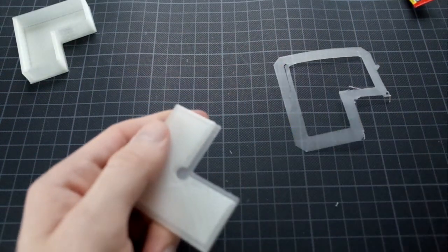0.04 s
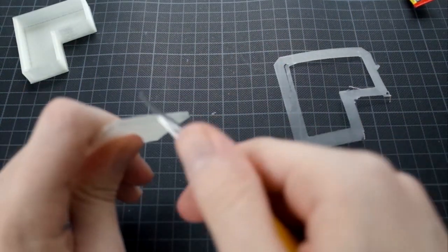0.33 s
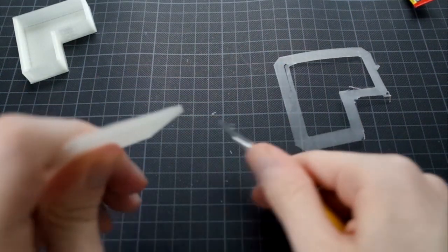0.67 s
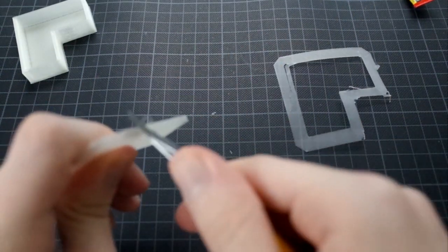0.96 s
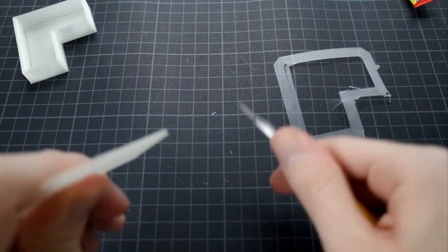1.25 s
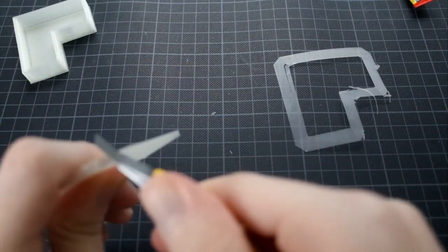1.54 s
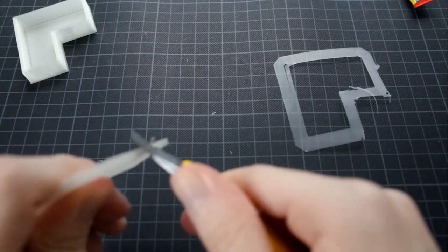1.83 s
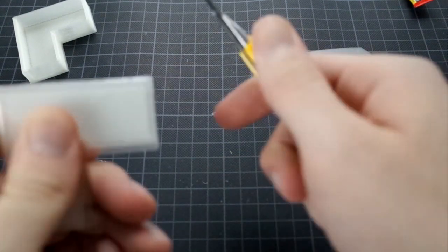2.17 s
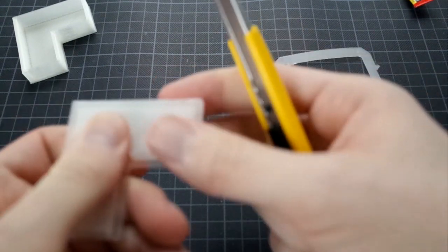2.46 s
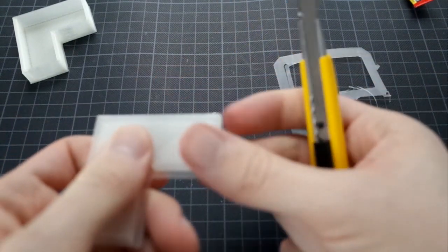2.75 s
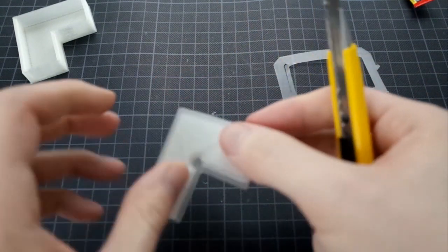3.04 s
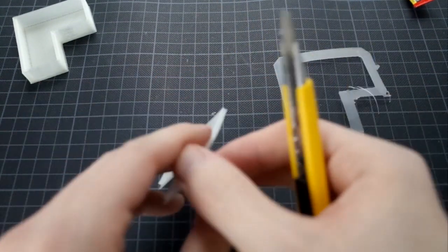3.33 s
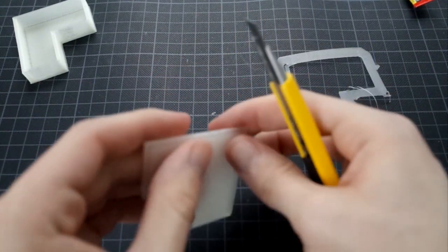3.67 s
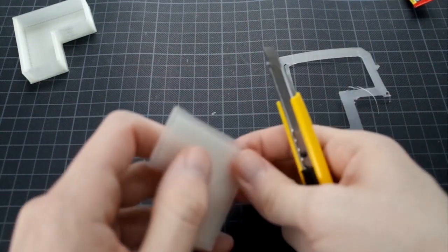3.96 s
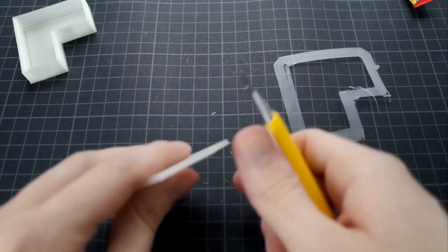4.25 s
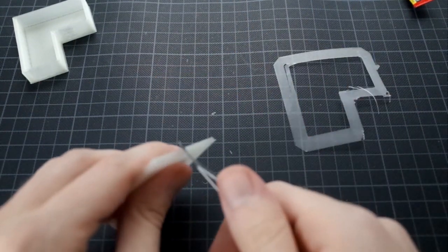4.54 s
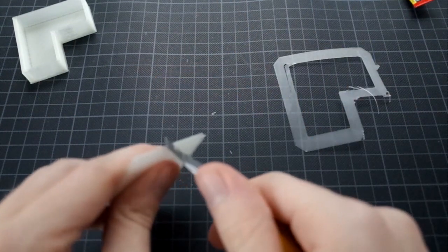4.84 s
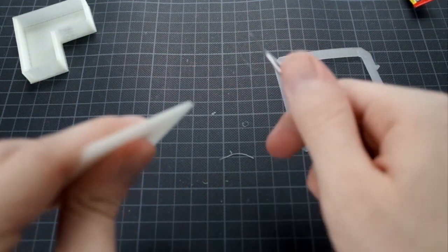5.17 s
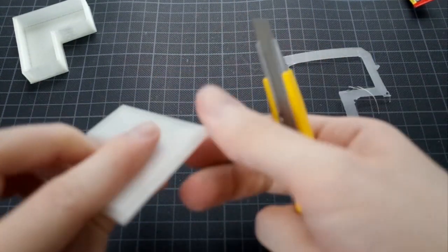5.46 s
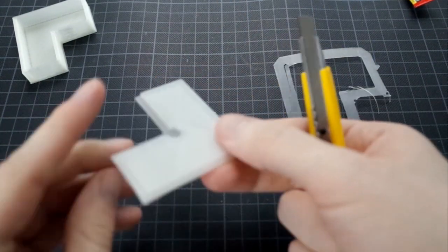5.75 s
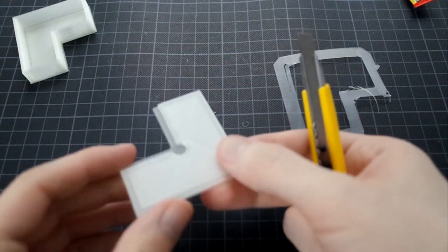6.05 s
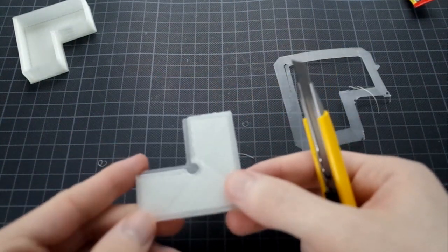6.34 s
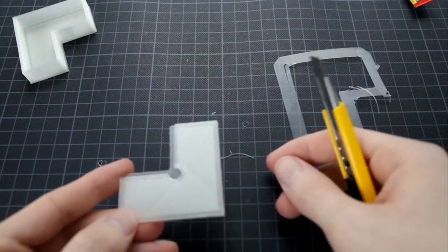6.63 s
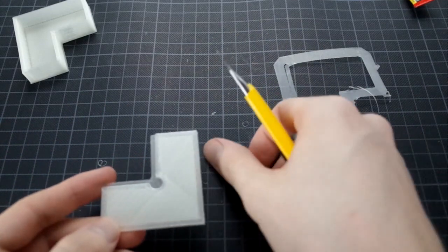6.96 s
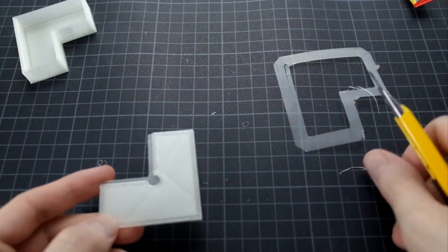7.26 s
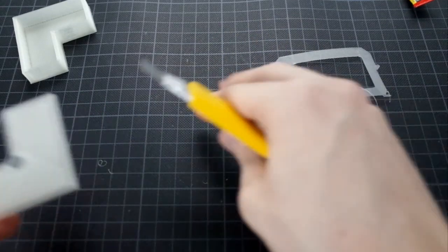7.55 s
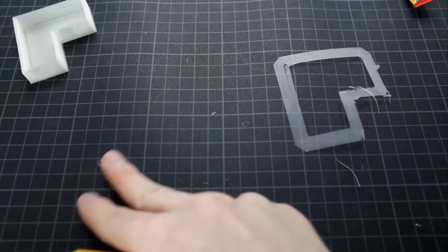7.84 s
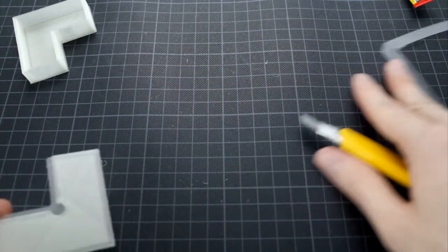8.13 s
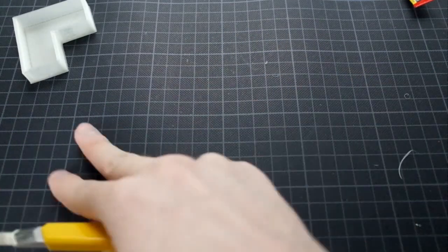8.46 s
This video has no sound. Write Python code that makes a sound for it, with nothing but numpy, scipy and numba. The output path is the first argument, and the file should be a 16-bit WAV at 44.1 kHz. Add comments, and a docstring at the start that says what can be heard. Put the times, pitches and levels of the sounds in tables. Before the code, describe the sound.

Light ticks of plastic in the fingers open, with a brief fading hiss at 0.25 seconds. From 0.5 to 2.1 seconds a utility knife trims a small plastic part: it clicks onto the edge, scrapes in short thin rasps and snaps free, sharpest at 0.8, 1.35 and 2.1 seconds. From about 2.7 to 4.5 the part is turned with many quiet ticks and skin rubs, and knuckles bump and judder on the cutting mat around 3.5. The blade clicks at 4.7, skips lightly, scrapes and snaps at 5.15, with a low, soft boom from the table. Sparse faint ticks follow. After a light knock at 7.1, a hand brushes the mat, then makes a louder, airy sweep from left to right between 8 and 8.5. Everything is close to a stereo microphone in a small dry room, over dull handling rumble, faint steady hiss and a low hum.

```python
"""Light ticks of plastic in the fingers and a brief hiss, then a utility knife lands on a printed part.
Close to a stereo microphone in a small dry room, the blade trims the thin brim: it clicks down, scrapes
along the edge in tiny slips and snaps free. The part is turned with ticks and rubs, hands bump and slide
on the cutting mat, the table booms, and at last a hand sweeps the shavings aside from left to right.
Underneath lie dull handling rumble, steady hiss and a faint hum."""
import sys
import numpy as np
from scipy import signal
from scipy.fft import rfft, irfft, next_fast_len
from scipy.io import wavfile
from numba import njit

SR = 44100
rng = np.random.default_rng(int(sys.argv[2]) if len(sys.argv) > 2 else 0)


def wrap_up_sound(samples):
    """Save the sound to the file named by the first command line argument, as 16-bit audio."""
    columns = np.atleast_2d(samples).T
    # keep every value between -1 and 1, then stretch to whole-number steps
    tamed = np.clip(columns, -1, 1)
    steps = np.round(tamed * 32767).astype(np.int16)
    wavfile.write(sys.argv[1], SR, steps)


N = 374850

# How alike the two microphones hear close sound. Each row: frequency in Hz, likeness from -1 to 1.
CLOSE_LIKENESS = [(2500, 0.99), (4500, 0.64), (8000, 0.027)]
# The same for sound from all around. Each row: frequency in Hz, likeness from -1 to 1.
DIFFUSE_LIKENESS = [(500, 0.6), (3000, 0.026)]
PART_HZ = 4000   # the plastic part's own resonance


def blade_clicks():
    """The blade lands hollowly and snaps free: the close sound, and plain cracks to feed the room."""
    # The blade meets the edge. Each row: start in seconds, level in dB, tilt in dB per octave.
    landings = [(0.5394, -19.5, -0.5), (1.0888, -18, 0), (1.6978, -27.5, -1.5)]
    # The blade catches or breaks free. Each row: start in seconds, level in dB, tilt in dB per octave,
    # ring frequency in Hz, ring height in dB.
    snaps = [(0.7858, -10.5, 3, 3380, 16), (1.194, -36, 1, 2290, 28), (1.3235, -27.5, 1.5, 3790, 0),
             (1.3371, -28, -2, 3450, 7), (1.3466, -16, 3.5, 3660, 16.5), (1.9314, -30.5, -8.5, 3420, 17),
             (2.0482, -30, -5, 3680, 26), (2.0721, -16, 1, 5900, 7.5), (4.674, -27, 5, 3970, 22.5),
             (5.1348, -29, -3, 3780, 15), (5.1425, -15.5, 1.9, 5630, 1.5)]
    # Spectra of a landing and of a snap. Each row: frequency in Hz, level in dB.
    landing_colour = [(250, -38), (885, -12.5), (1430, -26.5), (2300, -1.5), (2880, -21), (3240, -6.5),
                      (4440, 0), (6100, -11.5), (7080, 2), (7820, -13), (13300, -3), (16000, -16.5)]
    snap_colour = [(150, -25.5), (950, -15), (1500, -17.5), (3200, -6), (5800, -0.5), (13500, -8.5),
                   (16000, -13)]
    direct, into_room = np.zeros((2, 2, N))
    plain_crack = coloured(signal.unit_impulse((2, 4096)), snap_colour, CLOSE_LIKENESS,
                           lambda hz: peak(hz, ring_hz=6270, ring_db=0.5, width_hz=750))
    for start, db, tilt in landings:
        add(direct, start, click(landing_colour, db, decay_ms=3.8, tilt=tilt, shape=1.4))
    for start, db, tilt, ring_hz, ring_db in snaps:
        snap = click(snap_colour, db, decay_ms=3, tilt=tilt, shape=1.0,
                     ring=lambda hz: peak(hz, ring_hz, ring_db, width_hz=650))
        add(direct, start, snap)
    for start, db, *_ in landings + snaps:
        add(into_room, start, at_level(plain_crack, db - 13.5))
    return direct, into_room


def click(colour, db, decay_ms, tilt, shape, ring=np.zeros_like):
    """A crack in the plastic, tilted above 2 kHz; the grip decides which resonance stands out."""
    def shade(hz):
        return tilt * np.log2(np.maximum(hz, 2000) / 6000) + ring(hz)
    crack = burst(decay_ms, rise_ms=.8, shape=shape)
    return at_level(coloured(crack, colour, CLOSE_LIKENESS, shade), db)


def blade_scrape():
    """The edge sticks and slips through the print layers, ringing the steel and the gripped part."""
    # Spectrum of the rasp. Each row: frequency in Hz, level in dB.
    rasp_colour = [(200, -23.5), (900, -14), (1500, -18), (2250, -5.5), (7000, -5), (11000, -5.5),
                   (16000, -11.5)]
    # Resonances of the steel blade. Each row: frequency in Hz, level relative to the stroke in dB.
    blade_modes = [(7500, -15.5), (11900, -8.5), (13400, -21)]
    force_db, grip_hz, ring_db = blade_strokes()
    rasp = coloured(friction(per_s=900, spread_db=1.6, smooth=.5), rasp_colour, CLOSE_LIKENESS)
    # two resonances of the part shift under the blade
    upper = resonate(rasp, 1.04 * grip_hz + 220 * drift(110), width_hz=800.0)
    lower = resonate(rasp, .76 * grip_hz + 220 * drift(110), width_hz=800.0)
    part = rms_one(upper - 0.78 * lower) * from_db(ring_db)
    steel = 0
    for hz, db in blade_modes:
        mode = rms_one(resonate(rasp, np.full(N, float(hz)), width_hz=1300.0))
        steel = steel + mode * from_db(db + 3 * drift(35))   # comes and goes as the contact moves
    return (0.81 * rasp + steel + part) * from_db(force_db + 1.27 * drift(90))


def blade_strokes(bite_s=0.0023, release_s=0.0055, sag_hz_per_s=3100):
    """Each stroke bites, gains or loses force and lets go; the resonance falls as the blade travels."""
    # Cuts along the edge. Each row: start and length in seconds, level at mid-stroke in dB, change over
    # the stroke in dB, the part's nominal resonance in Hz, its ring relative to the stroke in dB.
    strokes = [(0.576, 0.11, -64, 6.5, 3600, 3), (0.693, 0.085, -47.5, 4, 3280, 0),
               (1.144, 0.11, -50.5, -4.5, 3550, -4), (1.266, 0.091, -44.5, 14, 3600, -7),
               (1.836, 0.088, -48.5, -6, 3500, -8), (1.92, 0.056, -43, -2, 3300, -7),
               (2.041, 0.023, -41, 8, 3700, -3.5), (5.068, .046, -45, -5, 4150, -9),
               (5.112, 0.021, -48, 4, 3870, 0), (5.141, 0.011, -37, -6, 5600, -2)]
    t = np.arange(N) / SR
    force, grip_hz, ring_db = 1e-9, PART_HZ, 0
    for start, length, db, change_db, hz, stroke_ring_db in strokes:
        age = np.clip(t - start, 0, length)
        bite = np.minimum(age / bite_s, 1)
        release = np.exp(-np.maximum(t - start - length, 0) / release_s)
        force = force + bite * release * from_db(db + change_db * (age / length - .5))
        grip_hz = np.where(t > start, hz - sag_hz_per_s * (age - length / 2), grip_hz)
        ring_db = np.where(t > start, stroke_ring_db, ring_db)
    return 20 * np.log10(force), grip_hz, ring_db


def handling_ticks(width_hz=670):
    """The part and the loose blade tick in the fingers; once the tip skips over the print's ridges."""
    # Light contacts. Each row: start in seconds, level in dB, ring frequency in Hz.
    touches = [(0.0155, -35, 4500), (0.128, -42, 4650), (0.1814, -39.5, 7000), (1.4352, -42, 6640),
               (1.7662, -39.5, 4940), (2.940, -47.5, 5070), (2.986, -44.5, 5000), (3.0549, -36.5, 5600),
               (3.103, -40, 6600), (3.1588, -36.5, 8450), (3.196, -34.5, 5440), (3.241, -37, 3800),
               (3.2787, -40.5, 5840), (3.3333, -33.5, 5800), (3.3877, -35, 5700), (3.6765, -34.5, 8300),
               (3.719, -36, 5660), (3.8124, -38.5, 5590), (3.9018, -38.5, 7200), (3.919, -38.5, 5950),
               (3.9898, -33.5, 8820), (4.0646, -37, 6100), (4.206, -46, 5800), (4.5253, -35, 4630),
               (4.538, -41, 5400), (4.7469, -41, 3700), (4.836, -50, 4060), (4.9552, -37.5, 4100),
               (5.1797, -36.5, 5500), (5.681, -43.5, 5100), (5.7301, -43.5, 5300), (6.4552, -47, 6550),
               (6.7707, -36.5, 6350)]
    # Spectrum of a tick. Each row: frequency in Hz, level in dB.
    tick_colour = [(150, -50), (1200, -18), (1900, -9), (3200, -4.5), (7500, -1.5), (11000, -2.5),
                   (16000, -10)]
    skips = [(4.885 + 0.012 * k, -44 + rng.normal(), PART_HZ) for k in range(4)]
    out = np.zeros((2, N))
    for start, db, ring_hz in list(touches) + skips:
        ring_db = 9.5 + peak(ring_hz, PART_HZ, 8.5, width_hz)   # rings on near the part's own resonance
        tick = click(tick_colour, db, decay_ms=1.9, tilt=.5 * rng.normal(), shape=1.2,
                     ring=lambda hz: peak(hz, ring_hz, ring_db, width_hz))
        add(out, start, tick)
    return out


def finger_rubs():
    """Skin rasps on the ridged plastic; each grip has its own resonance, wavering as the finger moves."""
    # Shifts of the grip. Each row: middle and length in seconds, level in dB, resonance in Hz.
    grips = [(2.732, 0.29, -67, 6670), (3.095, 0.038, -52.5, 6600), (3.441, 0.04, -51.5, 7800),
             (3.574, 0.13, -52.5, 6820), (3.67, 0.016, -52, 4050), (3.933, 0.13, -61, 6840),
             (4.228, 0.41, -63, 8100), (4.303, 0.034, -58, 4080), (4.348, 0.038, -52.5, 7300),
             (5.512, 0.13, -62.5, 7700), (5.833, 0.04, -61.5, 3930), (6.672, 0.029, -62, 7680)]
    # Spectrum of skin on plastic. Each row: frequency in Hz, level in dB.
    finger_colour = [(2000, -8.5), (3700, -6), (7000, -2.5), (12500, -1.5), (16000, -13)]
    rasp = coloured(friction(per_s=550, spread_db=3.0, smooth=.5), finger_colour, CLOSE_LIKENESS)
    waver = 1 + 0.037 * drift(25)
    out = 0
    for middle, length, db, ring_hz in grips:
        ring = rms_one(resonate(rasp, ring_hz * waver, width_hz=320.0)) * PART_HZ / ring_hz
        out = out + (rasp + ring) * swells([(middle, length, db)], shape=0.6)
    return out * from_db(2 * drift(45))


def hand_sweeps(air_lag_s=0.057):
    """A hand brushes over the cutting mat; the airy top swells more steeply and peaks later."""
    # Passes of the hand. Each row: touch, fastest moment and lift in seconds, rub in dB, airy top in dB.
    sweeps = [(7.153, 7.317, 7.41, -48.5, -60), (7.954, 8.24, 8.475, -43.5, -43)]
    # Spectra of the rub and of its airy top. Each row: frequency in Hz, level in dB.
    rub_colour = [(600, -25), (1500, -8), (7500, 0), (13000, 0), (16000, -28)]
    air_colour = [(8000, -21.5), (14500, 0)]
    rub = coloured(friction(per_s=11000, spread_db=2.5, smooth=1.2), rub_colour, CLOSE_LIKENESS)
    air = diffuse_noise(air_colour)
    out = np.zeros((2, N))
    for touch, fastest, lift, rub_db, air_db in sweeps:
        rub_gain = sweep_gain(touch, fastest, lift, rise_db=15.5, fall_db=24.5)
        air_gain = sweep_gain(touch, fastest + air_lag_s, lift, rise_db=22.5, fall_db=18)
        out += rub * from_db(rub_db) * rub_gain + air * from_db(air_db) * air_gain
    return out


def sweep_gain(touch, fastest, lift, rise_db, fall_db, slowing_s=0.21, contact_s=0.022):
    """A hand crosses from left to right: it lands, speeds up, loses fall_db per slowing_s and lifts."""
    t = np.arange(N) / SR
    contact = np.clip(np.minimum(t - touch, lift - t) / contact_s, 0, 1)
    lift_db = -fall_db * (lift - fastest) / slowing_s
    speed_db = np.interp(t, [touch, fastest, lift], [-rise_db, 0, lift_db])
    pan_db = np.interp(t, [touch, lift], [2, -2])
    return contact * from_db(speed_db + pan_db * [[1], [-1]])


def knuckle_pushes(creak_hz=2200.0):
    """Knuckles judder over the mat in uneven slips; a hard push creaks."""
    # Pushes. Each row: middle and length in seconds, level in dB, creak relative to that level in dB.
    pushes = [(3.499, 0.074, -50, -17), (3.609, 0.068, -50, -3), (4.616, 0.12, -56, -14)]
    # Spectrum of knuckles on the mat. Each row: frequency in Hz, level in dB.
    push_colour = [(130, -15), (350, 5.5), (550, -4.5), (820, 3), (1200, -6), (2500, -12), (3400, -17.5),
                   (16000, -16)]
    judder = coloured(friction(per_s=260, spread_db=2, smooth=.25), push_colour, CLOSE_LIKENESS)
    creak = rms_one(resonate(judder, np.full(N, creak_hz), width_hz=570.0))
    return sum((judder + creak * from_db(creak_db)) * swells([(middle, length, db)], shape=0.95)
               for middle, length, db, creak_db in pushes)


def skin_slides():
    """Skin slides on the mat or the knife's handle, with a hollow tone set by the shape of the hand."""
    # Soft rubs. Each row: middle and length in seconds, level in dB, lower hollow resonance in Hz.
    slides = [(2.8, .05, -64.5, 980), (5.841, 0.022, -61, 1150), (7.279, 0.14, -53.5, 840),
              (7.61, 0.067, -58.5, 810), (7.634, .02, -51, 920), (8.17, 0.41, -66, 860)]
    # Spectrum of sliding skin. Each row: frequency in Hz, level in dB.
    slide_colour = [(700, -0.5), (2000, -4), (16000, -14)]
    out = 0
    for middle, length, db, low_hz in slides:
        noise = rng.standard_normal((2, 32768))
        tone = coloured(noise, slide_colour, CLOSE_LIKENESS, lambda hz: hollow(hz, low_hz))
        rub = np.zeros((2, N))
        add(rub, middle - length / 2, tone)
        out = out + rub * swells([(middle, length, db)], shape=0.6)
    return out


def table_bumps():
    """Soft blows on the mat; the table top booms under them, a little to the left."""
    # Blows. Each row: start in seconds, level in dB, decay in ms, treble cutoff in Hz, boom gain in dB.
    bumps = [(3.4713, -34, 1.2, 2160, -50), (5.170, -31, 35, 607, 4.5), (7.126, -34.5, 1.7, 6000, -17)]
    # Spectrum of a blow. Each row: frequency in Hz, level in dB.
    blow_colour = [(500, -0.5), (6000, 1.5), (16000, 9)]
    # Table top modes. Each row: frequency in Hz, level in dB before the boom gain, seconds to fall 60 dB.
    table_modes = [(50.6, -53, 0.56), (119.5, -56.5, .9), (360.7, -61, 0.358), (473, -61.5, 0.45)]
    out, t = np.zeros((2, N)), np.arange(SR) / SR
    boom = sum(from_db(db - 60 * t / t60) * np.sin(2 * np.pi * hz * t) * (-1) ** k
               for k, (hz, db, t60) in enumerate(table_modes))
    for start, db, decay_ms, dull_hz, boom_db in bumps:
        def muffle(hz):
            return .5 * hollow(hz, low_hz=887) - 10 * np.log10(1 + (hz / dull_hz) ** 6)
        blow = coloured(burst(decay_ms, rise_ms=0.26, shape=0.88), blow_colour, CLOSE_LIKENESS, muffle)
        add(out, start, at_level(blow, db))
        add(out, start, boom * from_db(boom_db + np.array([[1.5], [-1.5]])))
    return out


def hand_rumble():
    """Dull noise of the moving hands, stronger in the left microphone."""
    # Movements. Each row: middle and length in seconds, level in dB before panning.
    movements = [(.12, 0.28, -58.5), (1.0, 0.1, -58.5), (1.6, 0.39, -62), (2.26, 0.1, -58),
                 (3.81, 0.19, -59.5), (4.54, 0.53, -58.5)]
    # Spectrum of the rumble. Each row: frequency in Hz, level in dB.
    rumble_colour = [(20, -19), (65, 4), (200, -5.5), (2000, -32.5)]
    return diffuse_noise(rumble_colour) * swells(movements, shape=0.84) * from_db([[2.5], [-4]])


def dying_hiss(start, db, t60):
    """A short bright hiss that starts at once and dies away."""
    # Spectrum of the hiss. Each row: frequency in Hz, level in dB.
    hiss_colour = [(1200, -14.5), (2200, 0), (6000, 1), (16000, -8)]
    age = np.arange(N) / SR - start
    return diffuse_noise(hiss_colour) * (age > 0) * from_db(db - 60 * np.abs(age) / t60)


def room_reflections(x, gap_s, early_db, early_s):
    """Dense reflections of a small room, strongest from the table nearby, dying band by band."""
    # Decay of the room. Each row: frequency in Hz, seconds to fall 60 dB.
    decay_times = [(1000, 0.48), (8000, 0.32)]
    t, edges_hz = np.arange(SR // 2) / SR, np.geomspace(60, 18000, 9)
    tail = 0
    for low, high in zip(edges_hz, edges_hz[1:]):
        noise = diffuse_noise([(2500, -0.83), (6000, -0.95)], len(t))   # almost white
        band = signal.sosfilt(signal.butter(2, [low, high], "band", fs=SR, output="sos"), noise)
        tail = tail + band * from_db(-60 * t / at_hz(decay_times, np.sqrt(low * high)))
    early_lift = 1 + from_db(early_db) * np.exp(-t / early_s)
    response = rms_one(tail * (t > gap_s) * early_lift) / np.sqrt(len(t))   # unit energy
    return signal.fftconvolve(x, response, axes=1)[:, :N]


def room_tone(hum_hz=208.0, hum_grows_s=6.14):
    """Steady hiss, and a wavering hum in the centre that grows louder late on."""
    # Spectrum of the noise floor. Each row: frequency in Hz, level in dB.
    floor_colour = [(20, -8.5), (230, -12), (900, -20.5), (1400, -24), (6700, -27), (16000, -29.5)]
    hum = rms_one(resonate(rng.standard_normal((2, N)), np.full(N, hum_hz), width_hz=30.0)[0])
    grown = np.clip(2 * (np.arange(N) / SR - hum_grows_s), 0, 1)
    return hum * from_db(-76 + 5.5 * grown) + from_db(-65.5) * diffuse_noise(floor_colour)


def lean_left(x, above_hz=8800, share=.16):
    """The left microphone faces the work and catches more of its treble."""
    treble = signal.sosfilt(signal.butter(1, above_hz, "high", fs=SR, output="sos"), x)
    return x + share * treble * [[1], [-1]]


def friction(per_s, spread_db, smooth):
    """Tiny slips of uneven size over a smooth rub."""
    slipping = rng.random(N) < per_s / SR
    sizes = from_db(spread_db * np.minimum(rng.exponential(1, N), 4))
    power = signal.lfilter([1], [1, -.9], (slipping * sizes) ** 2 + 1e-18)
    return rng.standard_normal((2, N)) * np.sqrt(power / power.mean() + smooth)


def burst(decay_ms, rise_ms, shape, size=4096):
    """A cluster of micro-cracks that swells and dies within milliseconds."""
    ms = np.arange(size) / SR * 1000
    cracks = np.tanh(2 * rng.standard_normal((2, size)))
    return cracks * (1 - np.exp(-(ms / rise_ms) ** 2)) * np.exp(-(ms / decay_ms) ** shape)


def swells(rows, shape):
    """Gain of separate movements, each speeding up and slowing down."""
    t = np.arange(N) / SR
    return sum(from_db(db) * np.maximum(1 - (2 * (t - middle) / length) ** 2, 0) ** shape
               for middle, length, db in rows)


def drift(per_s):
    """A smooth random wander of rms 1."""
    knots = rng.standard_normal(int(N / SR * per_s) + 2)
    return rms_one(np.interp(np.arange(N) / SR * per_s, np.arange(len(knots)), knots))


def coloured(pair, spectrum, likeness, shade=np.zeros_like):
    """Two excitations become left and right through a body filter, with shade added in dB; rms 1."""
    n = pair.shape[1]
    size = 2 * next_fast_len(n // 2 + 1024)
    hz = np.arange(size // 2 + 1) * SR / size
    cepstrum = irfft(np.log(from_db(at_hz(spectrum, hz) + shade(hz))))
    cepstrum[1:size // 2] *= 2
    cepstrum[size // 2 + 1:] = 0   # minimum phase: nothing sounds early
    mid, side = rfft(pair, size) * np.exp(rfft(cepstrum))
    alike = at_hz(likeness, hz)
    left_right = np.sqrt(1 + alike) * mid + np.sqrt(1 - alike) * side * [[1], [-1]]
    return rms_one(irfft(left_right)[:, :n])


def diffuse_noise(spectrum, size=N):
    """Coloured noise that reaches the microphones from all around; rms 1."""
    return coloured(rng.standard_normal((2, size)), spectrum, DIFFUSE_LIKENESS)


@njit
def resonate(x, hz, width_hz):
    """A resonance whose centre can move; gain 1 at its peak."""
    y, r = np.zeros_like(x), np.exp(-np.pi * width_hz / SR)
    for i in range(2, x.shape[1]):
        feedback = 2 * r * np.cos(2 * np.pi * hz[i] / SR)
        for c in range(2):
            drive = (1 - r * r) / 2 * (x[c, i] - x[c, i - 2])
            y[c, i] = drive + feedback * y[c, i - 1] - r * r * y[c, i - 2]
    return y


def peak(hz, ring_hz, ring_db, width_hz):
    """A resonance as a bump in dB."""
    return ring_db / (1 + (2 * (hz - ring_hz) / width_hz) ** 2)


def hollow(hz, low_hz):
    """Two broad resonances that together sound hollow, in dB."""
    return sum(peak(hz, centre, ring_db=15.5, width_hz=270) for centre in (low_hz, low_hz * 1.736))


def at_hz(points, hz):
    """Read a curve on a log-frequency axis."""
    point_hz, value = np.transpose(points)
    return np.interp(np.log(np.maximum(hz, 1)), np.log(point_hz), value)


def at_level(hit, db):
    """Scale a hit of rms 1 to the energy of one millisecond at this level."""
    return hit * from_db(db) * np.sqrt(SR / 1000 / hit.shape[1])


def add(out, start, sound):
    """Mix a sound in at a start time in seconds."""
    i = max(int(start * SR), 0)
    out[:, i:i + sound.shape[1]] += sound[:, :N - i]


def from_db(db):
    """Decibels to amplitude."""
    return 10 ** (np.asarray(db) / 20)


def rms_one(x):
    """Scale to an rms of 1."""
    return x / np.sqrt(np.mean(x ** 2) + 1e-20)


def scene():
    """Knife and fingers close to the microphones, the table just below, the small room around them."""
    clicks, cracks = blade_clicks()
    scrape = blade_scrape()
    handling = handling_ticks() + finger_rubs()
    table = hand_sweeps() + knuckle_pushes() + skin_slides() + table_bumps()
    into_room = (cracks + from_db(-18.5) * clicks + from_db(-11.0) * scrape
                 + from_db(-9.5) * handling + from_db(-6.0) * table)
    reverb = room_reflections(into_room, gap_s=.003, early_db=11.0, early_s=0.0051)
    close = lean_left(clicks + scrape + handling)
    background = hand_rumble() + dying_hiss(start=0.2447, db=-45.0, t60=0.39) + room_tone()
    return close + table + reverb + background


def record(dry):
    """A steep low-pass cuts the top at 15.9 kHz."""
    return signal.sosfilt(signal.ellip(12, .1, 80, 15900, fs=SR, output="sos"), dry)


dry = scene()
out = record(dry)
wrap_up_sound(out)
```